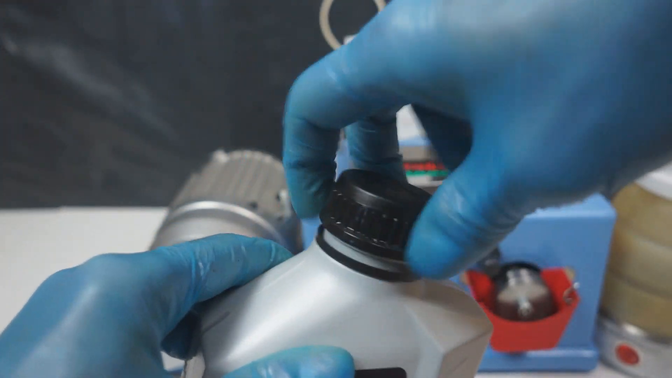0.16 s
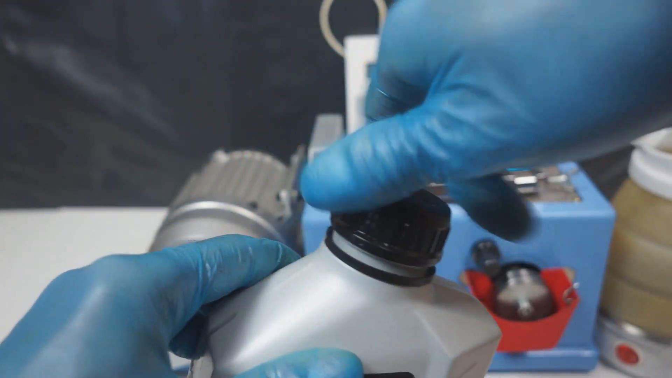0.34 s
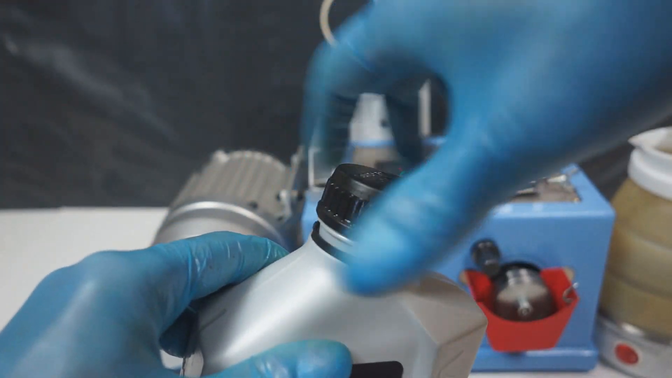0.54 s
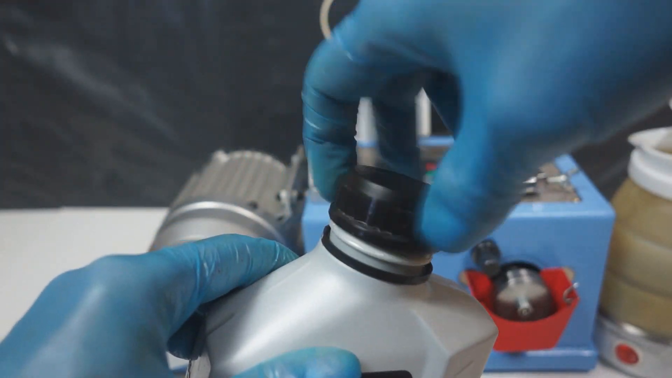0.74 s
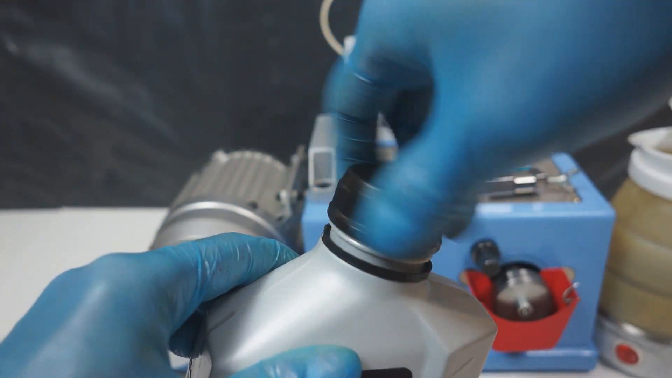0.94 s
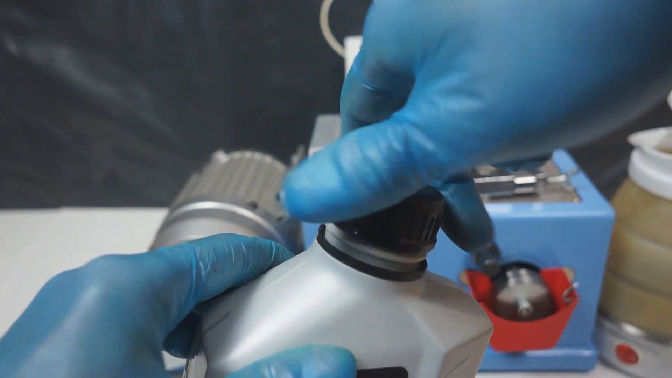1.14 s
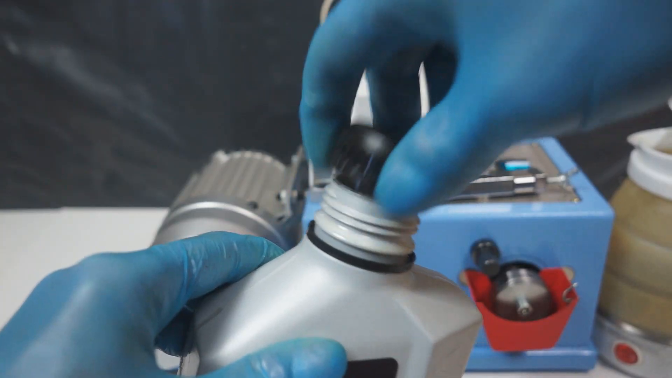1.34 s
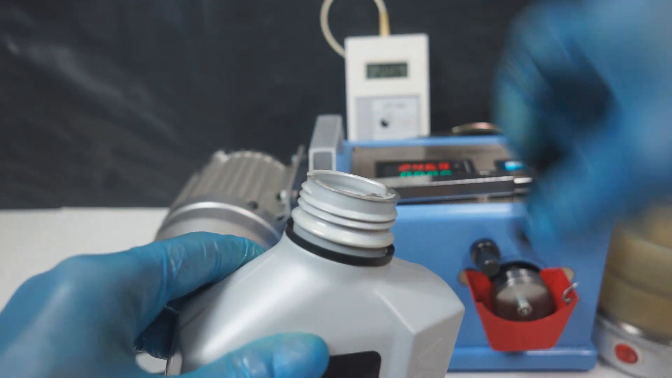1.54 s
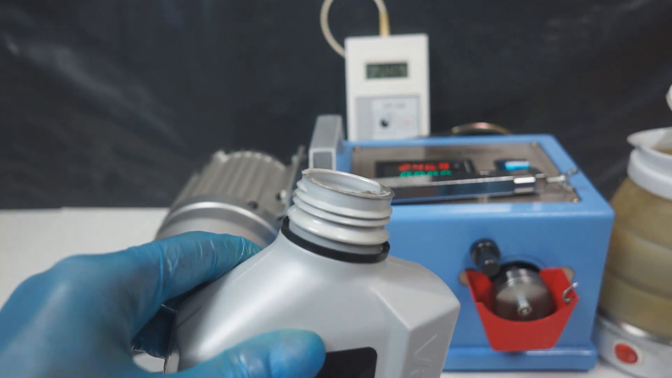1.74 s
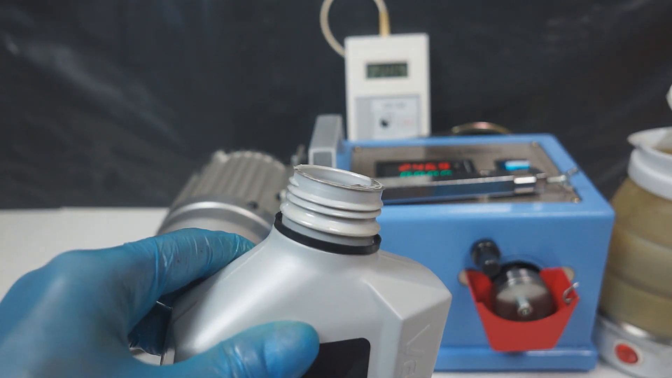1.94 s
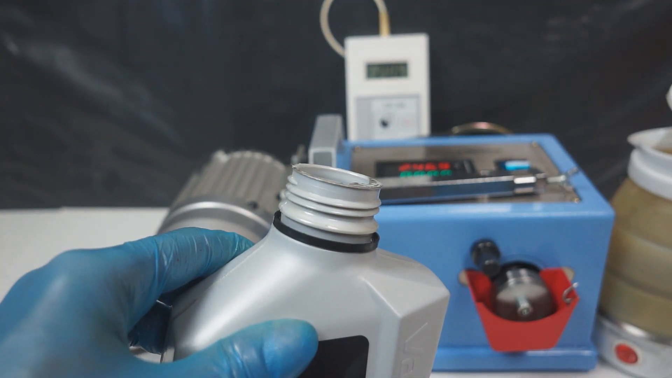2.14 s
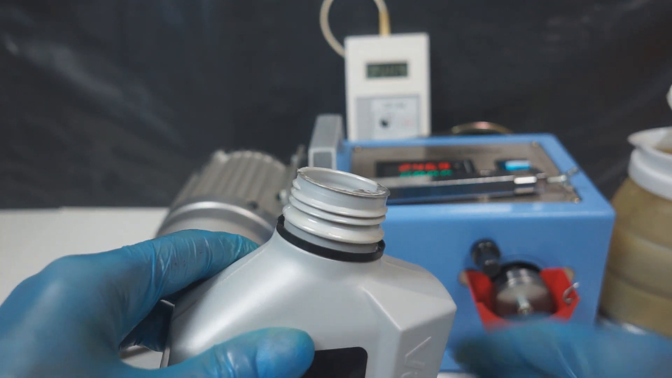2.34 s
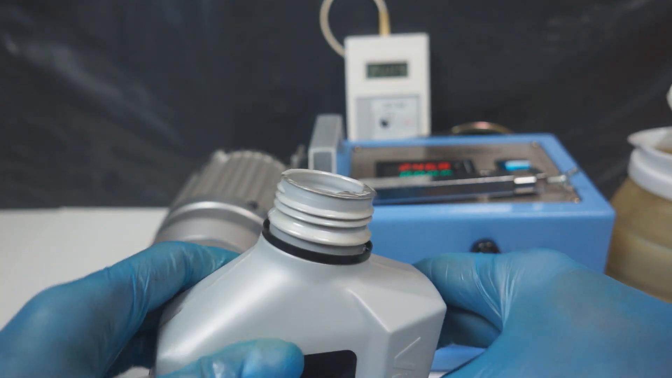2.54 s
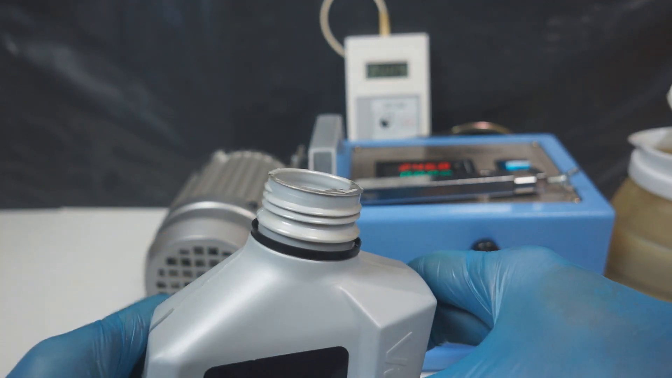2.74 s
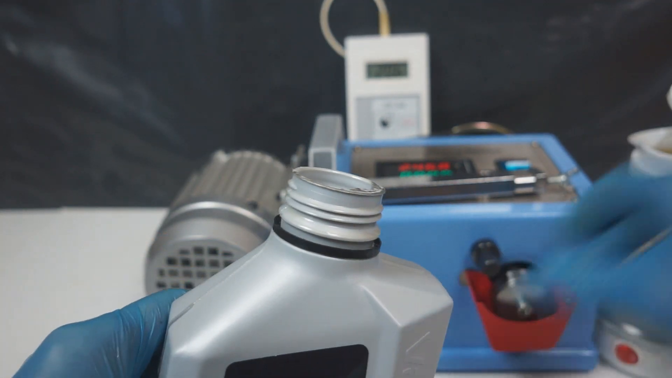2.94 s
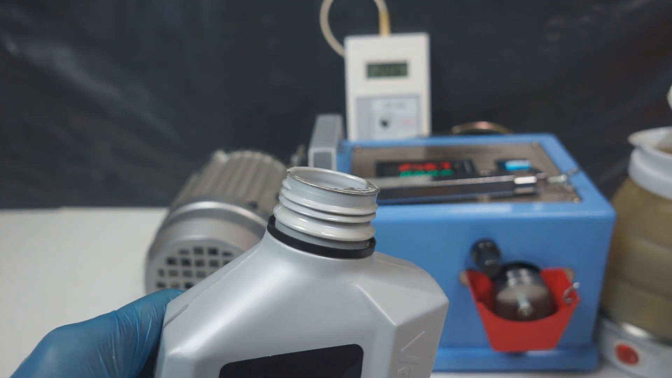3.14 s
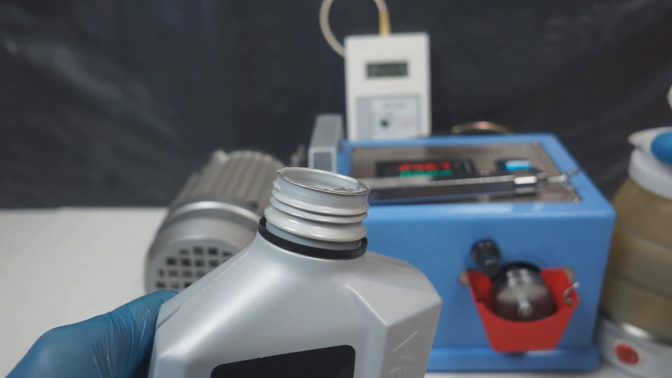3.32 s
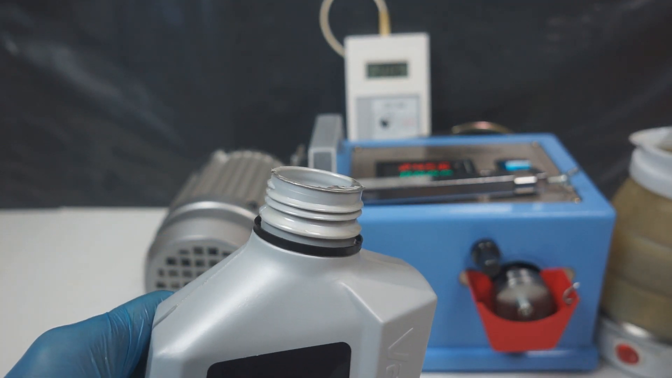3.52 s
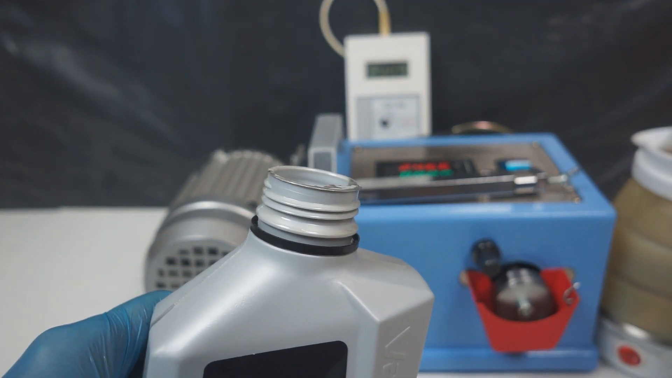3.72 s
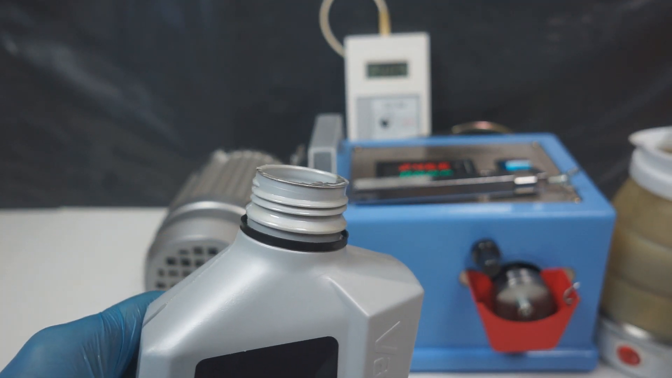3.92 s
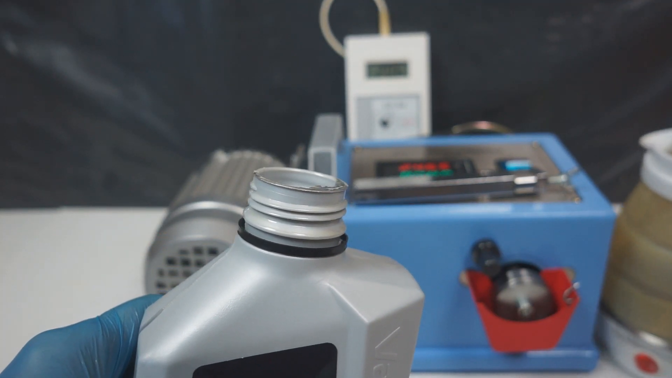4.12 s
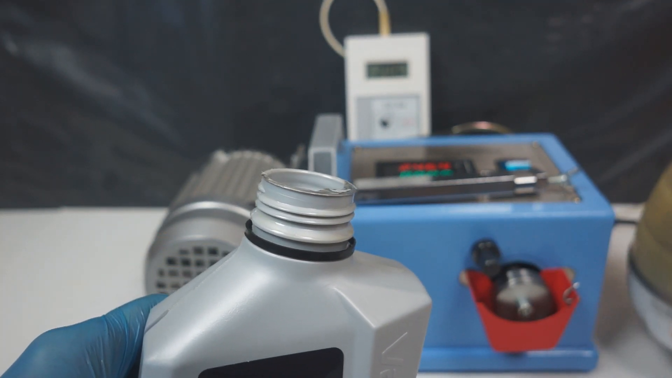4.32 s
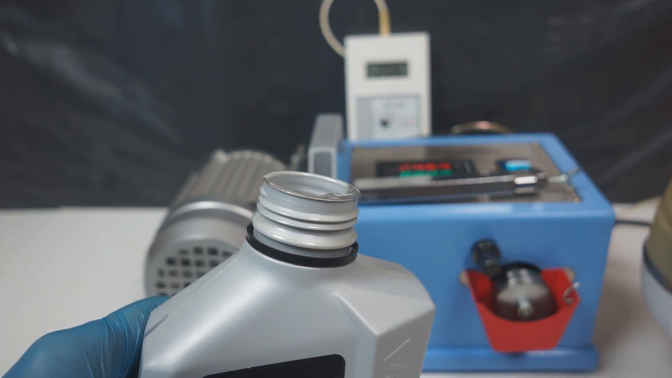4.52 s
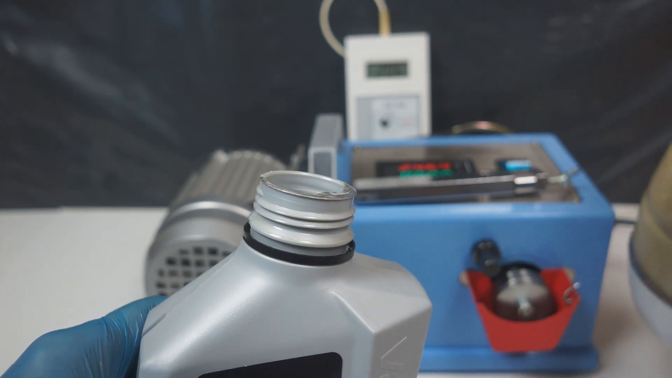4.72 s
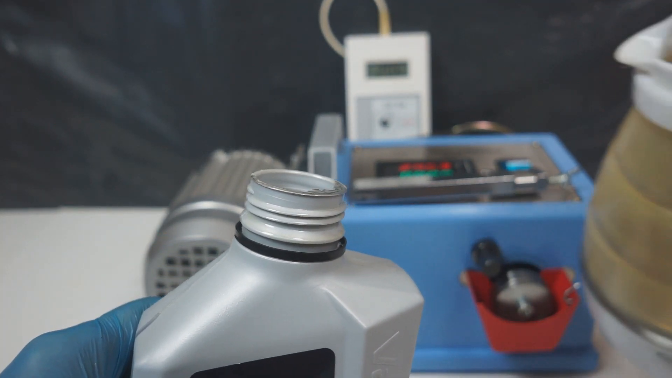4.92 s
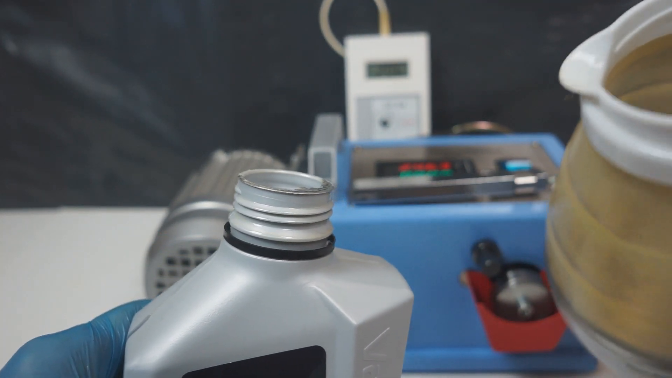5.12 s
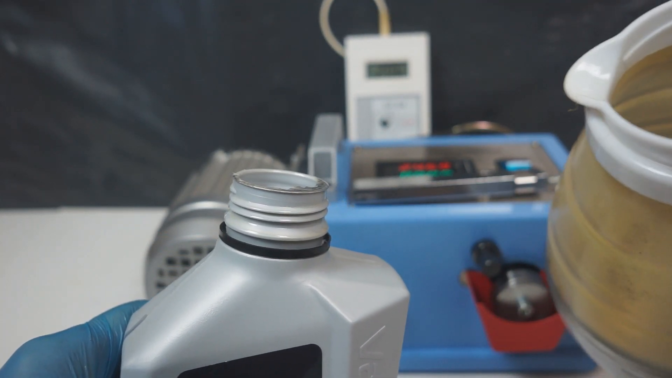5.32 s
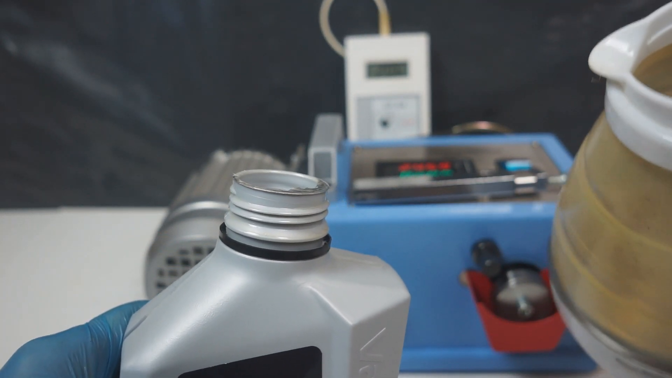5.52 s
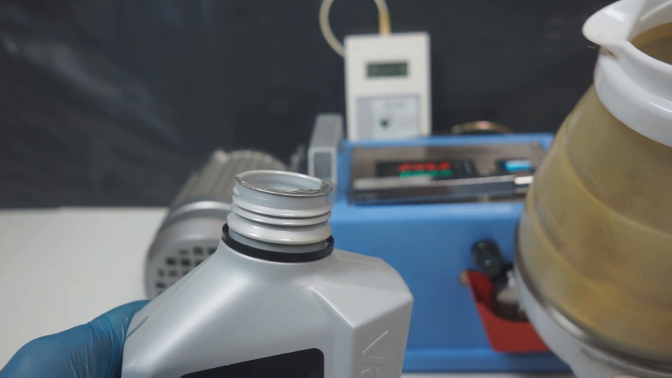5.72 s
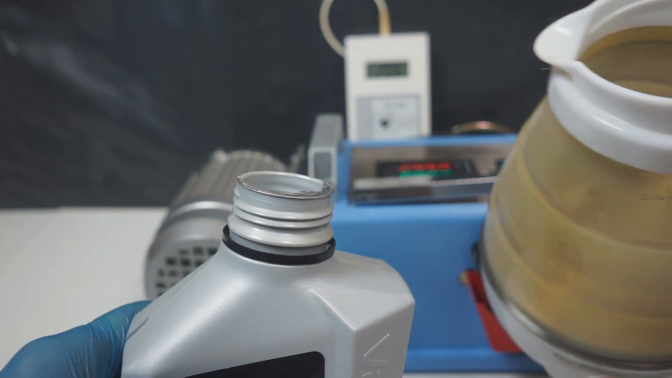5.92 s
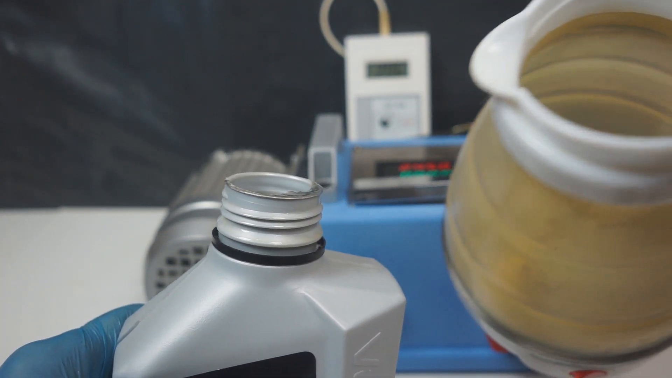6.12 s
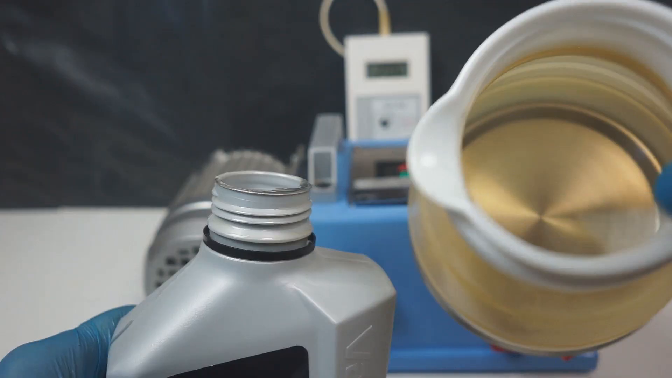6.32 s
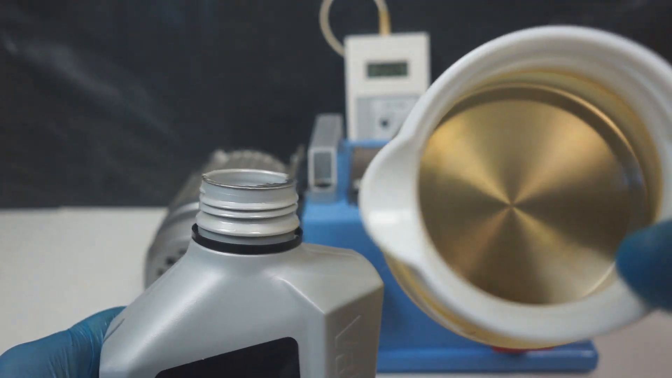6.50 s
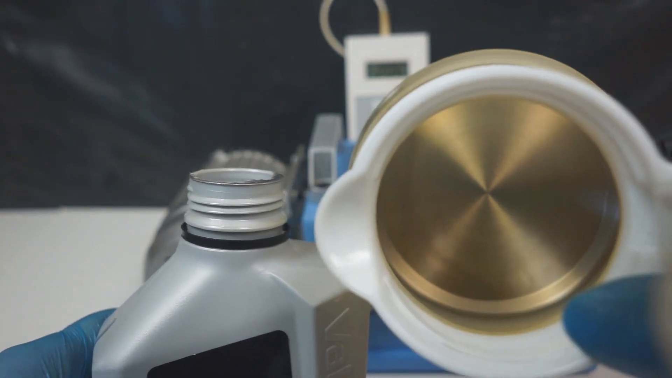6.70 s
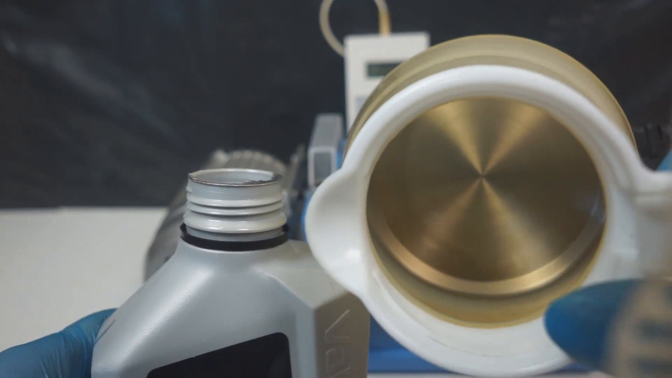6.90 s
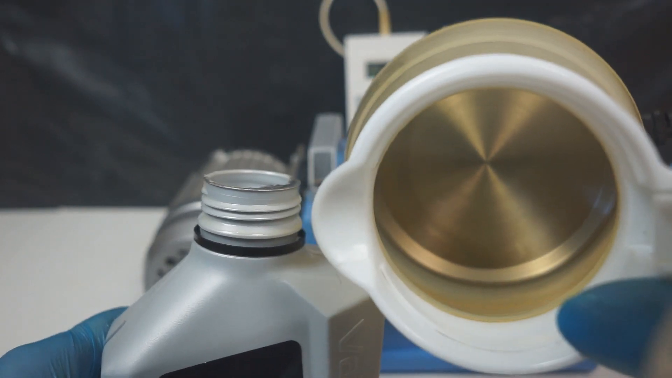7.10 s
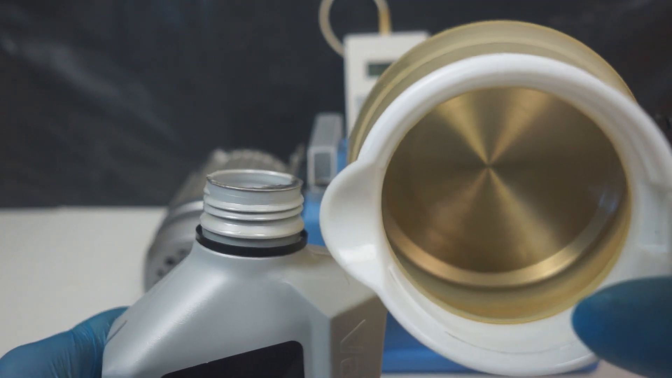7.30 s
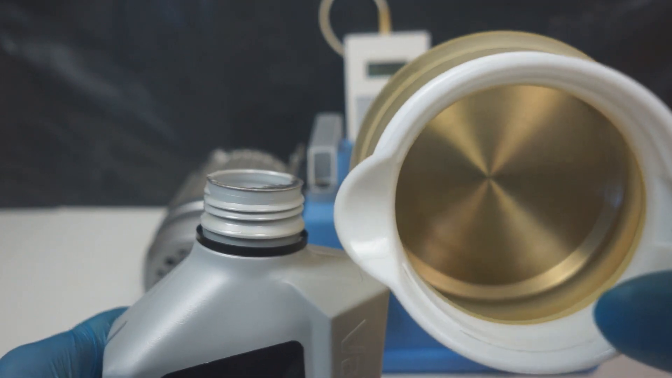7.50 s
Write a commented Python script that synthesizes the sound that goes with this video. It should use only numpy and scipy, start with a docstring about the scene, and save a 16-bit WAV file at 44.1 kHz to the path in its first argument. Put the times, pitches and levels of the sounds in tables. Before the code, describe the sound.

Close to the microphone, a gloved hand twists a screw cap off a plastic bottle with sharp clicks and short rasps. The cap drops on a bench, bouncing and rocking to rest. After some light glove rustle, a plastic jug is dragged in short scrapes with hollow bumps, knocks loudly and is lifted. The glove slides around it and fades. A small workshop hums faintly behind.

```python
"""Plastic clicks and rasps close by, in stereo: a gloved hand flicks the cap off an oil bottle.
The cap drops on a bench and rattles to rest; then a plastic jug is dragged, lifted and turned.
Knocks are short rough contacts and rubs are stick-slip grains, both ringing the plastic's modes;
soft bumps sound one hollow note each. Behind it all, a small workshop hums and throbs."""
import sys
import numpy as np
from scipy import signal
from scipy.fft import rfft, irfft, next_fast_len
from scipy.io import wavfile
from scipy.ndimage import uniform_filter1d

SR = 44100
rng = np.random.default_rng(int(sys.argv[2]) if len(sys.argv) > 2 else 0)


def store_wav(level_fs):
    """Save 16-bit WAV to argv[1]."""
    pcm = np.round(np.clip(np.atleast_2d(level_fs), -1, 1) * 32767)
    wavfile.write(sys.argv[1], SR, pcm.T.astype(np.int16))


N = 332955

# Workshop bed: (frequency [Hz], relative density [dB])
SHOP_SPECTRUM = [(25, -50), (60, -29), (170, -20.5), (280, -12.5), (480, -12), (900, -14.5), (2100, -23),
                 (4500, -23), (8000, -25), (15800, -26)]
# Machine resonances: (centre [Hz], width [Hz], level re the bed [dB])
MACHINE_RINGS = [(309, 27, -8.5), (653, 58, -6.5), (1685, 110, -13.5), (4740, 190, -16)]
# Fader rides; the bed dips after the loudest knock and creeps back: (time [s], level [dB])
SHOP_FADER = [(0, -54), (5.75, -54), (5.85, -62.5), (7.55, -58.5)]
HUM_FADER = [(0.0, -70), (0.19, -87), (0.28, -74), (0.61, -67.5), (0.78, -73.5), (2.39, -75), (2.53, -91),
             (2.65, -70), (2.84, -79), (2.9, -96), (3.07, -74), (3.29, -78), (5.27, -79.5), (5.6, -101)]

# Voices of the objects and of glove on plastic: (centre [Hz], nominal width [Hz], gain [dB])
BOTTLE_MODES = [(233, 148, -5.5), (520, 400, -2), (830, 427, 0.5), (1654, 720, 5), (2320, 1440, -2),
                (3190, 1110, 0.5), (5120, 2140, -4.5), (7670, 1030, -4.5), (9960, 2700, -3.5)]
CAP_MODES = [(736, 270, 0), (1206, 150, -0.5), (1430, 170, -1.5), (2070, 400, 4), (2630, 170, -2),
             (3280, 1290, -5), (4880, 1160, -3), (6560, 230, 0), (9100, 7900, -7)]
JUG_MODES = [(588, 210, 0.5), (770, 120, 4), (1110, 400, -3), (1946, 187, 2), (2247, 290, -1.5),
             (3160, 570, -0.5), (3470, 390, 5), (3800, 340, 2), (4066, 310, 3.5), (4810, 400, -1),
             (5850, 280, -4), (6900, 440, -4.5), (8300, 840, -10), (10100, 3200, -15)]
GLOVE_MODES = [(550, 520, -1), (1040, 510, 8), (1840, 6200, -8), (3510, 1420, 5.5), (4970, 3540, 3),
               (8000, 8900, 0), (13100, 2500, -3.5)]
BENCH_MODE = (210, 72, -3)

# Hard knocks: (time [s], level [dB], crack re level [dB])
NECK_HITS = [(0.019, -22.5, -5.5), (0.078, -33, 8), (0.372, -29.5, -1), (0.4254, -32, -16),
             (0.4913, -29, 12.5), (0.4964, -17.5, 2.5), (0.675, -30.5, -15), (0.7139, -21, -24),
             (0.7808, -25.5, -2), (0.7958, -38, -7), (0.9302, -14.5, -3), (0.967, -32.5, -3),
             (1.2922, -34, 8), (1.3017, -22.5, -3), (1.332, -16.5, -4), (3.463, -23.5, -37)]
JUG_HITS = [(3.6718, -33, 5.5), (4.2637, -21, -8.5), (4.321, -41.5, 14), (4.4787, -34, -17),
            (4.5435, -51, 11), (4.575, -31.5, -8), (4.7004, -19.5, -2.5), (4.709, -28.5, -15),
            (4.8608, -29, -2), (4.927, -26, -4), (5.4324, -42, 9), (5.729, -29, -4), (5.759, -16.5, -8),
            (5.7642, -12, -2), (5.773, -23, 6.5), (5.7828, -25, -19), (5.7938, -15.5, 1.5),
            (5.7973, -10.5, 4)]
# The cap lands flat (short contact) or rocks over its ribs (long):
# (time [s], level [dB], crack re level [dB], contact [ms])
CAP_HITS = [(2.0768, -17, -50, 1.22), (2.139, -24, -20, 1.6), (2.142, -12.5, -17, 12),
            (2.2455, -16.5, -19, 11.9), (2.3405, -17, -11.5, 7.5), (2.4255, -14.5, 4.5, 1.51),
            (2.4573, -34, -12, 3.3), (2.8699, -29, -3, 1.53), (2.9038, -35.5, -2.5, 11),
            (3.101, -50, 11.5, 1.3)]
# Soft bumps on hollow plastic: (time [s], level [dB], pitch [Hz], ring [ms])
HOLLOW_BUMPS = [(.931, -31.5, 226, 24), (1.2975, -23.5, 660, 4.4), (1.332, -15, 632, 8.9),
                (1.334, -49, 3140, 190), (1.348, -29, 573, 23), (1.412, -45, 700, 20),
                (1.426, -40.5, 850, 39), (2.346, -20.5, 740, 20), (3.382, -41, 473, 11),
                (3.392, -42, 283, 6.2), (3.47, -50, 178, 29), (3.598, -38.5, 372, 3.1),
                (3.832, -46, 198, 30), (4.267, -26, 520, 15), (3.465, -39, 2320, 20), (4.479, -33, 790, 11),
                (4.716, -39.5, 563, 82), (5.323, -41, 760, 7.5), (5.588, -42, 640, 27),
                (5.714, -31.5, 540, 55), (5.728, -20, 548, 28), (5.785, -19, 880, 5.9),
                (5.823, -25, 726, 14), (6.622, -47, 950, 51), (6.656, -35.5, 513, 28),
                (6.893, -48, 930, 50), (7.269, -44, 468, 8.8)]
# Nudges that make the cap's cavity sing: (time [s], level [dB])
CAP_NUDGES = [(2.817, -39), (2.871, -28.5), (2.905, -27.5), (2.915, -32.5)]

# Rubs; brightness lifts hiss and thins body: (time [s], length [ms], level [dB], brightness [dB])
GLOVE_STROKES = [(.21, 168, -57.5, 1.5), (.505, 44.8, -54, 7), (.56, 201, -58.5, 5), (1.06, 345, -63, 4.5),
                 (1.33, 132, -75, -7), (1.43, 118, -59.5, 6), (1.62, 60, -62.5, 2), (1.77, 55.3, -71, 11.5),
                 (2.42, 240, -49, 0), (2.58, 272, -52.5, 4), (2.79, 102, -50.5, 2.5),
                 (2.975, 75.4, -59, 3.5), (3.13, 138, -63, 4.5), (3.455, 176, -58, -6), (3.66, 144, -55, 0),
                 (3.84, 85, -59, 2), (4.07, 59, -54, 3), (4.255, 154, -51.5, -6.5), (4.35, 390, -50, -4),
                 (4.86, 132, -46, -1.5), (5.07, 153, -49, -8), (5.67, 118, -54, -8.5),
                 (5.775, 52.7, -30.5, 3)]
TWIST_STROKES = [(.062, 136, -35.5, 0.5), (.385, 113.5, -37, 2.5), (.7, 82.6, -45, 5),
                 (.77, 40.5, -41.5, -6), (.93, 122, -50.5, 7)]
# Build-up to full grip: (attack [share of each twist])
TWIST_ATTACKS = [0.42, 0.67, 0.1, 0.11, 0.26]
# Cap rolling on the bench: (time [s], length [ms], level [dB])
ROLL_STROKES = [(2.08, 605, -51)]
# Jug scraping the bench: (time [s], length [ms], level [dB], body [dB], hiss [dB])
DRAG_STROKES = [(4.705, 161, -35.5, -5, -1.5), (4.94, 217, -35, 0, -2), (5.352, 155, -46.5, -4.5, -5.5),
                (5.585, 140, -46.5, -3, -4.5)]
DRAG_ATTACKS, DRAG_RELEASES = [0.36, 0.14, 0.041, 0.052], [.05, .35, .4, .6]  # shares of each drag
# The glove slides round the lifted jug: (time [s], glove level [dB], wall level [dB])
LIFT_FADERS = [(5.815, -82, -70), (5.83, -28, -36), (5.842, -32, -62), (5.968, -43, -62),
               (6.02, -47.5, -45), (6.104, -40.5, -46), (6.322, -50.5, -49.5), (6.43, -58.5, -57.5),
               (6.676, -60.5, -58.5), (6.732, -65.5, -87), (6.808, -73, -74), (6.91, -61.5, -58),
               (7.05, -80, -75)]
# Hollow note of the turning jug: (time [s], pitch [Hz])
WALL_PITCH = [(6.048, 820), (6.22, 729.5), (6.37, 561.7), (6.55, 900), (6.9, 804)]

HUM_HZ, THROB_HZ, THROB_DB = 68, 12.46, 2.5
ROOM_T60_S, ROOM_DB = 0.54, -9.5
BODY_HZ, CRACK_HZ, DRAG_HISS_HZ = 1150, 4050, 2600  # where modes split into body, middle and top
SNAP_MS, SPOT_DB = .03, 1.5  # each blow lands on a new spot and wakes the modes unevenly
USUAL_BLOW_DB, BODY_LAG = -30.5, 0.26  # harder blows sound thinner, by this many dB per dB
NECK_CONTACT_MS, JUG_CONTACT_MS = 1.213, 1.093
NECK_DULL_HZ, GRIP_DAMPING, WALL_WIDTH_HZ = 7300, 1.75, 375
CAP_NOTE_HZ, CAP_RING_MS = 900, 50
MIC_HZ, TOP_HZ = 14200, 15750


def undb(db):
    return 10 ** (np.asarray(db) / 20)


def unit(x):
    return x / np.sqrt(np.mean(x ** 2))


def pan(x, left_db):
    return undb([[left_db / 2], [-left_db / 2]]) * x


def lowpass(x, hz, order=2):
    return signal.sosfilt(signal.butter(order, hz, fs=SR, output="sos"), x)


def ring(x, hz, width):
    """Two-pole resonance, gain 1 at the centre."""
    return signal.lfilter(*signal.iirpeak(hz, hz / width, SR), x)


def wander(rate_hz):
    """Random levels gliding one into the next; spread near 1."""
    hold = int(SR / rate_hz)
    return 1.07 * uniform_filter1d(np.repeat(rng.standard_normal(N // hold + 1), hold), hold)[:N]


def workshop():
    """Diffuse machine noise whose resonances throb once a turn; rumble and a wavering hum sit right."""
    t = np.arange(N) / SR
    hz = np.maximum(np.fft.rfftfreq(N, 1 / SR), 1)
    points_hz, points_db = np.transpose(SHOP_SPECTRUM)
    colour = undb(np.interp(np.log(hz), np.log(points_hz), points_db))
    bass_pan = pan(1, -16.5 / (1 + (hz / 150) ** 2))[:, 0]
    bed = unit(irfft(rfft(rng.standard_normal((2, N))) * colour * bass_pan, N))
    throb = undb(THROB_DB * np.cos(2 * np.pi * THROB_HZ * (t - 1.79)) + 2.0 * wander(9.8))
    rings = sum(undb(db) * unit(ring(rng.standard_normal((2, N)), f, w)) for f, w, db in MACHINE_RINGS)
    machines = (bed + throb * rings) * undb(np.interp(t, *np.transpose(SHOP_FADER)))
    hum = np.sqrt(2) * np.sin(2 * np.pi * np.cumsum(HUM_HZ + 0.82 * wander(6)) / SR)
    hum *= undb(np.interp(t, *np.transpose(HUM_FADER)) + 2.5 * wander(7))
    return machines + hum * undb([[-12], [4]])


def room(x):
    """A short diffuse tail, different on each side and duller than the direct sound."""
    t = np.arange(16384) / SR
    tail = rng.standard_normal((2, len(t))) * 1000 ** (-t / ROOM_T60_S) * (t > .003)
    tail /= np.sqrt(np.sum(tail ** 2, axis=1, keepdims=True))
    wet = signal.fftconvolve(x.mean(axis=0, keepdims=True), tail, axes=1)[:, :N]
    return undb(ROOM_DB) * signal.lfilter([.6], [1, -.4], wet)


def resonate(x, modes, top_hz):
    """Ring an object's modes into body, middle and top stems; each acts twice, for steep skirts."""
    size = next_fast_len(len(x) + 4096)
    hz = np.maximum(np.fft.rfftfreq(size, 1 / SR), 1)
    response = np.zeros((3, len(hz)), complex)
    for k, (centre, width, db) in enumerate(modes):
        detune = centre / (1.5 * width) * (hz / centre - centre / hz)
        stem = np.searchsorted([BODY_HZ, top_hz], centre)
        response[stem] += (-1) ** k * undb(db) / (1 + 1j * detune) ** 2
    return irfft(response * rfft(x, size), size)[:, :len(x)]


def blows(hits, modes, body_db, sharpness, snap_db, chatter_db, chatter_ms, spread):
    """A rough contact, a snap at its height and a weaker chatter ring the modes; the crack is wide."""
    out, ms = np.zeros((2, N + 4096)), np.arange(4096) / SR * 1000
    for start, level_db, crack_db, contact_ms in hits:
        progress = ms / np.clip(contact_ms, .3, 15)
        contact = (progress * np.exp(1 - progress)) ** sharpness
        chatter = undb(chatter_db) * np.exp(-np.abs(ms - contact_ms) / chatter_ms)
        force = contact + chatter * np.minimum(progress, 1)
        snap = undb(snap_db) * np.exp(-((ms - contact_ms) / SNAP_MS) ** 2)
        struck = [(hz, width, db + SPOT_DB * rng.standard_normal()) for hz, width, db in modes]
        stems, side_stems = (resonate(force * noise - snap, struck, CRACK_HZ)
                             for noise in rng.standard_normal((2, len(ms))))
        peaks = np.abs(stems).max(axis=1)
        weight_db = body_db - BODY_LAG * (level_db - USUAL_BLOW_DB)
        mid = undb([weight_db, 0, crack_db]) / peaks @ stems
        side = spread * undb(crack_db) * side_stems[2] / peaks[2]
        i = int(start * SR)
        out[:, i:i + len(ms)] += undb(level_db) * np.array([mid + side, mid - side])
    return out[:, :N]


def strokes(table, attack, release):
    """Pressure rises, holds and falls over shares of each stroke; yields (power, body dB, hiss dB)."""
    t = np.arange(N) / SR
    attacks, releases = np.broadcast_to(attack, len(table)), np.broadcast_to(release, len(table))
    for (start, length_ms, level_db, *tone_db), up, down in zip(table, attacks, releases):
        pressure = np.interp((t - start) * 1000 / length_ms, [0, up, max(1 - down, up), 1], [0, 1, 1, 0])
        body_db, hiss_db = tone_db if len(tone_db) == 2 else (-sum(tone_db), sum(tone_db))
        yield undb(level_db) ** 2 * pressure ** 3, body_db, hiss_db


def rub(touches, modes, body_db, hiss_db, grain_db, slip_hz, slip_db, spread, top_hz=CRACK_HZ):
    """Dense, uneven stick-slip grains come in spurts and ring the object while each stroke lasts."""
    power = np.zeros((3, N))
    for middle, low_db, high_db in touches:
        power += [middle * undb(body_db + low_db) ** 2, middle, middle * undb(hiss_db + high_db) ** 2]
    spurts = undb(slip_db * wander(slip_hz))
    grains = (rng.standard_normal(N) * undb(grain_db * rng.exponential(size=N)) for _ in range(2))
    stems, side_stems = (resonate(spurts * grain, modes, top_hz) for grain in grains)
    gains = np.sqrt(power / np.mean(stems ** 2, axis=1, keepdims=True))
    mid = (gains * stems).sum(axis=0)
    side = spread * (gains * side_stems).sum(axis=0)
    return np.array([mid + side, mid - side])


def lift_gain(column):
    """Envelope of the one long slide round the lifted jug."""
    t, curve = np.arange(N) / SR, np.transpose(LIFT_FADERS)
    return (t > curve[0, 0]) * (t < curve[0, -1]) * undb(np.interp(t, curve[0], curve[column]))


def glove_rustle():
    """The glove brushes plastic in short strokes, then slides round the jug."""
    slide = (lift_gain(column=1) ** 2, 1.5, -3.5)  # more body, less hiss
    return rub([*strokes(GLOVE_STROKES, attack=0.2, release=0.42), slide], GLOVE_MODES,
               body_db=-5.0, hiss_db=0.5, grain_db=2.0, slip_hz=110, slip_db=1.77, spread=0.35)


def hollow_notes(bumps, swell_ms, rough):
    """Each soft, rough push swells one cavity note that dies quickly."""
    out, ms = np.zeros(N + 8192), np.arange(8192) / SR * 1000
    swell = ms / swell_ms * np.exp(-ms / swell_ms)
    for start, level_db, hz, ring_ms in bumps:
        push = swell * (np.sin(2 * np.pi * hz * ms / 1000) + rough * rng.standard_normal(len(ms)))
        width_hz = 1000 * np.log(1000) / np.pi / ring_ms
        note = ring(ring(push, hz, width_hz), hz, hz / 2)
        i = int(start * SR)
        out[i:i + len(ms)] += undb(level_db) * note / np.abs(note).max()
    return out[:N]


def jug_wall():
    """The wall hums hollow under the glove: a band of noise whose centre follows the turning jug."""
    phase = 2 * np.pi * np.cumsum(np.interp(np.arange(N) / SR, *np.transpose(WALL_PITCH))) / SR
    slow = lowpass(rng.standard_normal((4, N)), WALL_WIDTH_HZ / 2, order=4)
    mid, side = (slow[:2] * np.cos(phase) + slow[2:] * np.sin(phase)) * undb(1.5 * wander(40))
    return lift_gain(column=2) * unit(np.array([mid + .3 * side, mid - .3 * side]))


def jug_on_bench():
    """The grip shortens the jug's knocks; dragging it scrapes and sets the bench thrumming."""
    damped = [(hz, GRIP_DAMPING * width, db) for hz, width, db in JUG_MODES]
    knocks = blows([(*hit, JUG_CONTACT_MS) for hit in JUG_HITS], damped,
                   body_db=-6.5, sharpness=3.5, snap_db=11, chatter_db=-8.5, chatter_ms=19, spread=0.49)
    scrape = rub(strokes(DRAG_STROKES, DRAG_ATTACKS, DRAG_RELEASES), [BENCH_MODE, *JUG_MODES],
                 body_db=-7, hiss_db=-1, grain_db=3.5, slip_hz=150, slip_db=1.5, spread=0.17,
                 top_hz=DRAG_HISS_HZ)
    return knocks + scrape


def dropped_cap():
    """The cap bounces and rocks over its ribs, with a dull roll underneath."""
    bounces = blows(CAP_HITS, CAP_MODES, body_db=-6.5, sharpness=11.3, snap_db=8.5,
                    chatter_db=-3.5, chatter_ms=6.3, spread=0.33)
    roll = rub(strokes(ROLL_STROKES, attack=0.027, release=0.3), CAP_MODES,
               body_db=5.5, hiss_db=-18, grain_db=3.0, slip_hz=89, slip_db=3.5, spread=0.13)
    return bounces + roll


def bottle_neck():
    """Twists of the cap rasp on the neck, whose knocks are muffled by the fingers round it."""
    knocks = blows([(*hit, NECK_CONTACT_MS) for hit in NECK_HITS], BOTTLE_MODES,
                   body_db=1, sharpness=1.85, snap_db=4.5, chatter_db=-8, chatter_ms=8.5, spread=0.41)
    rasp = rub(strokes(TWIST_STROKES, TWIST_ATTACKS, release=0.32), BOTTLE_MODES,
               body_db=-1.0, hiss_db=2.0, grain_db=2.0, slip_hz=90, slip_db=2.25, spread=0.22)
    return lowpass(knocks, NECK_DULL_HZ) + rasp


def scene():
    """Close handling, mostly right of centre, with its room tail over the workshop bed."""
    near = pan(bottle_neck(), 1.0) + pan(jug_on_bench(), -4.0) + pan(dropped_cap(), -3.0)
    near += pan(glove_rustle(), -1.0) + pan(jug_wall(), -4.0)
    nudges = [(*nudge, CAP_NOTE_HZ, CAP_RING_MS) for nudge in CAP_NUDGES]
    notes = hollow_notes(HOLLOW_BUMPS, swell_ms=0.79, rough=6.1)
    notes += hollow_notes(nudges, swell_ms=0.73, rough=3.0)
    near += pan(notes, -4.5)
    return near + room(near) + workshop()


def record(dry):
    """The microphone softens the top octave and a steep low-pass cuts the air above."""
    return signal.sosfilt(signal.ellip(10, .2, 70, TOP_HZ, fs=SR, output="sos"), lowpass(dry, MIC_HZ))


dry = scene()
out = record(dry)
store_wav(out)
```